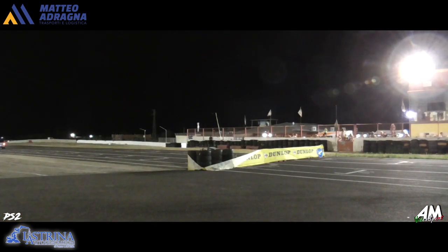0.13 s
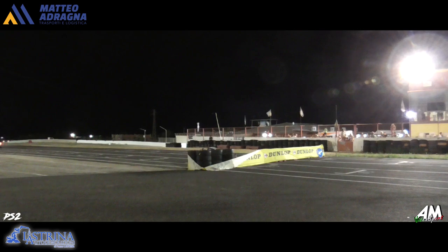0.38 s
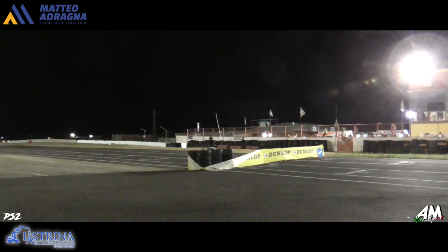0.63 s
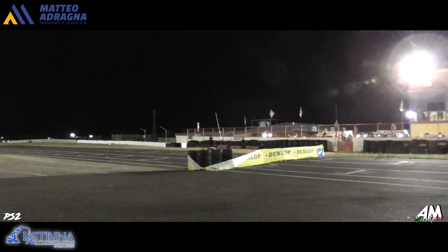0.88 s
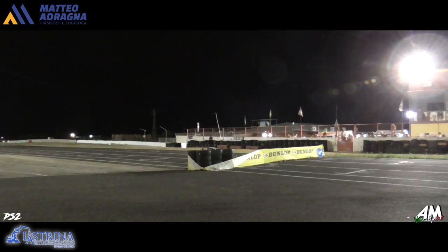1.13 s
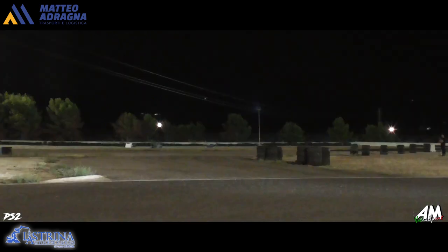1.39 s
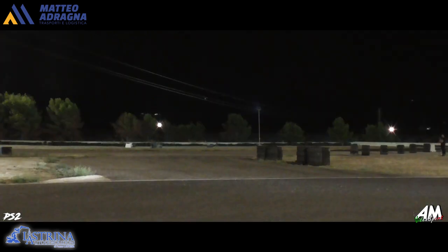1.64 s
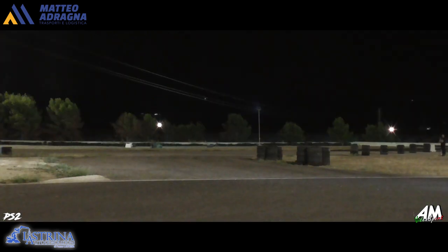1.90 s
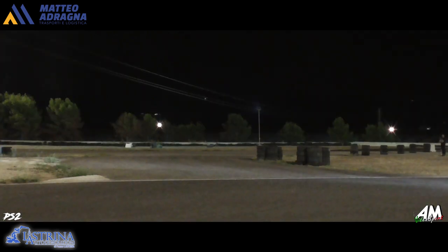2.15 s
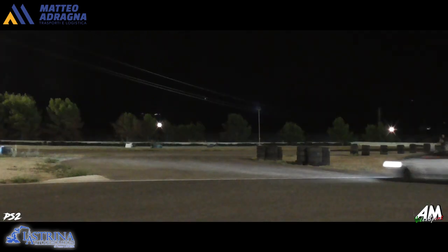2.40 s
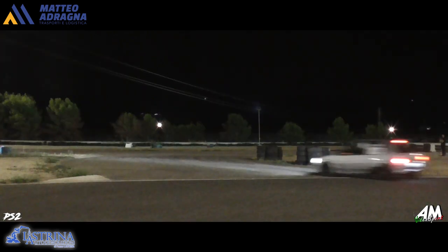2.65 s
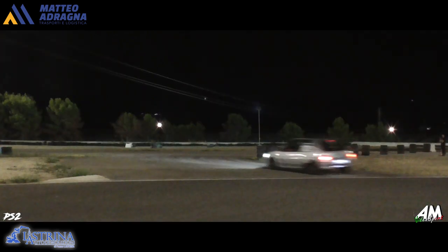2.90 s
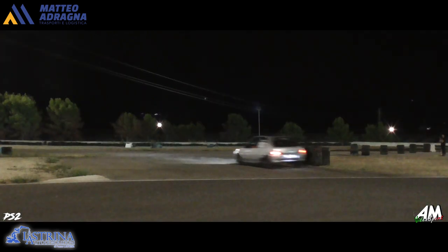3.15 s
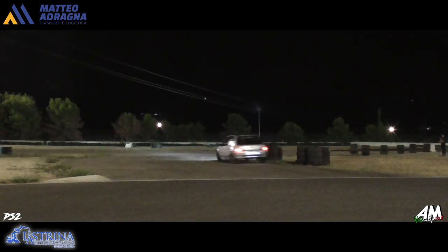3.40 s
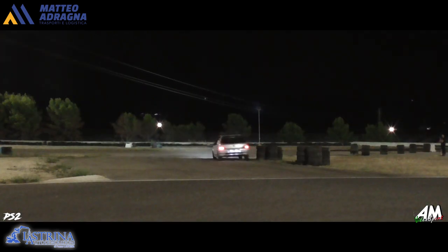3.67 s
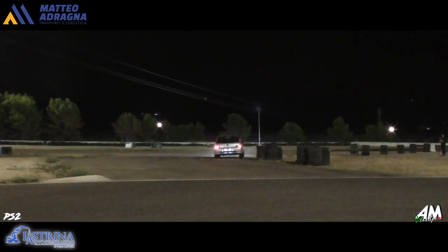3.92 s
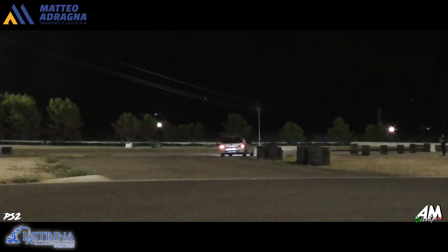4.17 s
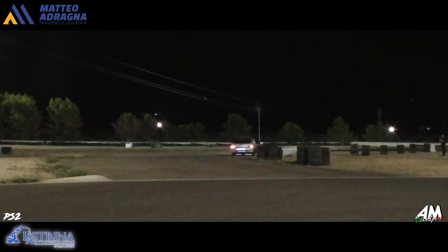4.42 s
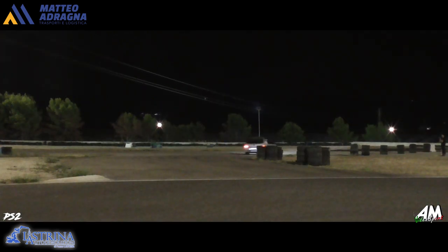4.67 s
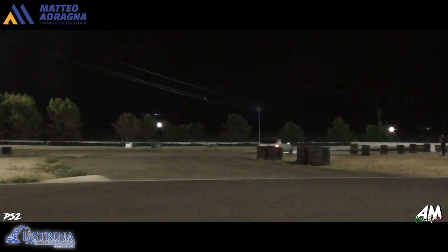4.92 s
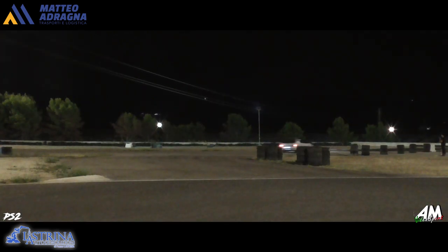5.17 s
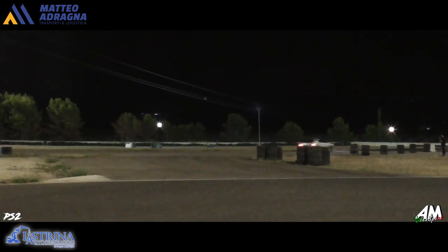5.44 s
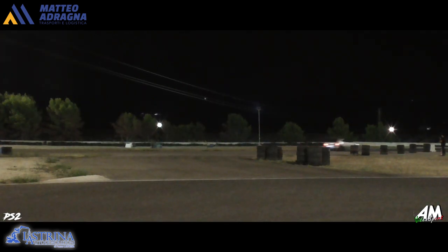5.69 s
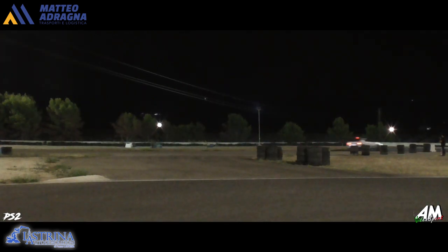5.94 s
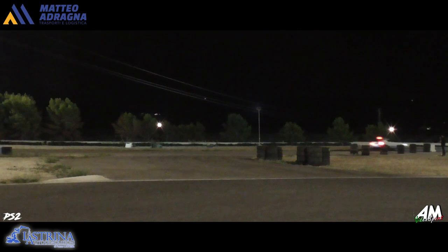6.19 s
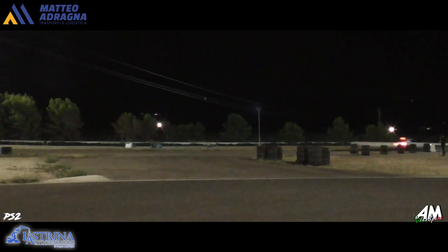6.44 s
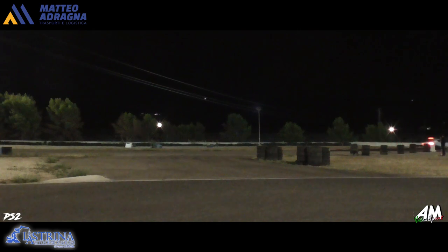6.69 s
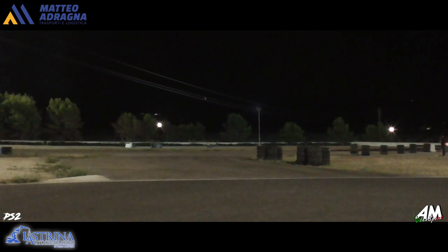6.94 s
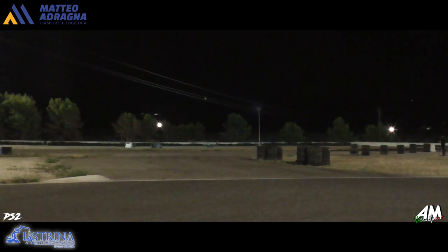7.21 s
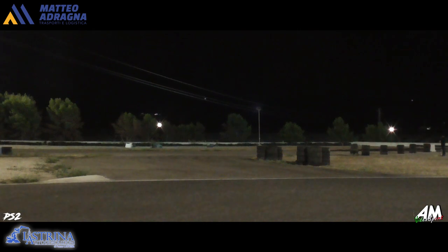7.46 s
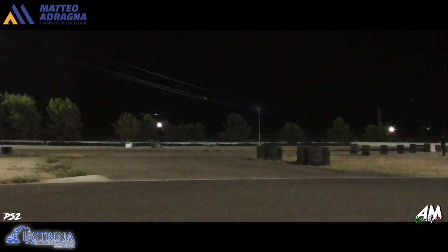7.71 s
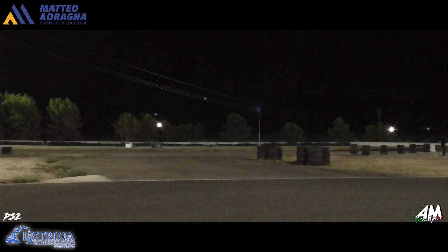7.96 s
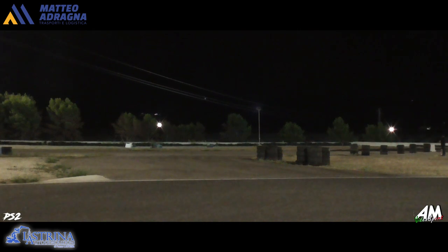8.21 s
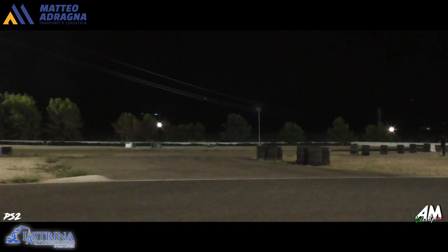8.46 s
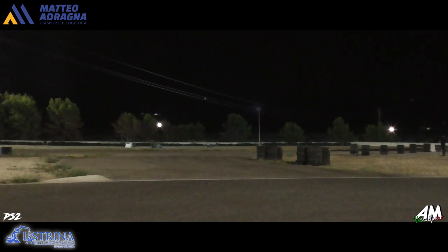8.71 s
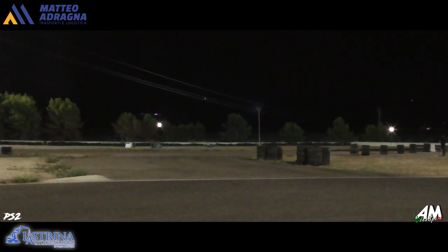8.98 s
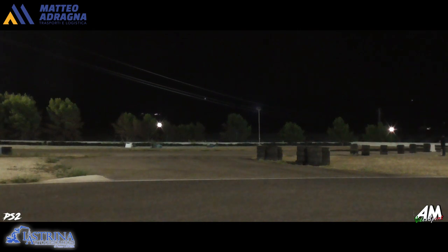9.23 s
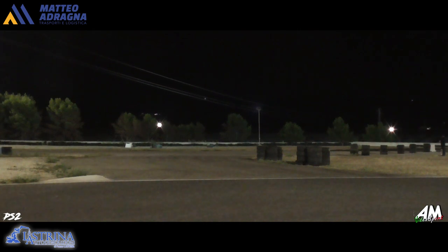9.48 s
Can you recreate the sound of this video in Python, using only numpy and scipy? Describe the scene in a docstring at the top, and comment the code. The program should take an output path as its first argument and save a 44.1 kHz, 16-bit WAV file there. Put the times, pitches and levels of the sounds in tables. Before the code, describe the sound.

Trackside at night, in stereo, with dull wall echoes and faint low wind. From 0 to 1.36 s a small four-cylinder engine climbs steadily, a smooth second engine droning close above it. A hard cut with a soft thump jumps to another bend: the near engine is raspier and hissier and its pitch sags, while a higher distant drone fades by 2.2 s. Grit pings around 2.8 to 3.1 s as the car goes by. At about 3.2 s a heavy booming backfire bursts out, followed by a brief thin, sputtering gap. From 3.8 s the engine pulls away, rising with pulsing rasp and a spitting, hissy edge near 4.4 to 4.8 s. At 6 s it lifts and sinks, quiet and low by 7.3 s. Sharp cracks pop around 7.5 s, then it surges again, climbing to the end with a distant engine rising alongside.

```python
"""The verge of a track at night: small four-cylinder cars; at CHANGE_S the listening spot jumps to another bend.
The near car is a stack of firing orders that rises under load and sags on lift-off, with gated noise for
its rasp, tyres and air. It backfires in damped booms and cracks, and its grit pings as short decaying sines.
A second engine further off drones higher on two smooth orders; dull echoes and lumpy low wind lie behind."""
import sys
import numpy as np
from scipy import signal
from scipy.fft import rfft, irfft, next_fast_len
from scipy.io import wavfile
from scipy.ndimage import uniform_filter1d

SR = 44100
rng = np.random.default_rng(int(sys.argv[2]) if len(sys.argv) > 2 else 0)


def dump_mix(stems):
    """Bounce the given channels to the path in sys.argv[1] as a 16-bit WAV at rate SR."""
    frames = np.atleast_2d(stems).T  # one column per channel
    limited = np.clip(frames, -1, 1)  # hard clip at full scale
    pcm = np.round(limited * 32767).astype(np.int16)
    wavfile.write(sys.argv[1], SR, pcm)


def gain_from_db(level_db):
    """Convert decibel levels to linear amplitude factors (20 dB per decade)."""
    decades = np.asarray(level_db, float) / 20
    return 10 ** decades


N = 423360
CHANGE_S = 1.359
HZ = np.maximum(np.fft.rfftfreq(N, 1 / SR), 1)


def rms_one(x):
    """Scale to unit rms."""
    return x / np.sqrt(np.mean(x ** 2) + 1e-20)


def in_time(rows):
    """Columns of a curve table, one value per sample."""
    s, *columns = np.transpose(rows)
    return [np.interp(np.arange(N) / SR, s, c) for c in columns]


def at_pitch(points, hz):
    """Read a spectrum table at any frequencies, on a log frequency axis."""
    table_hz, values = np.transpose(points)
    return np.interp(np.log(hz), np.log(table_hz), values)


def colour(x, spectrum):
    """Shape by a spectrum, then scale to unit rms."""
    return rms_one(irfft(rfft(x) * gain_from_db(at_pitch(spectrum, HZ)), N))


def span(start, end, edge):
    """One between two times, with ramps outside them."""
    t = np.arange(N) / SR
    return np.clip(1 + np.minimum(t - start, end - t) / edge, 0, 1)


def drift(rate):
    """Slow random wander of unit rms; a higher rate in Hz wanders faster."""
    knots_per_s = 40
    knots = rng.standard_normal(int(N / SR * knots_per_s) + 2)
    memory = np.exp(-2 * np.pi * rate / knots_per_s)
    slow = rms_one(signal.lfilter([1], [1, -memory], knots))
    return np.interp(np.arange(N) * knots_per_s / SR, np.arange(len(slow)), slow)


# Stereo width of the noises. Each row: Hz, side against mid in dB before a small overall cut.
SPREAD = [(60, -29.5), (110, -25), (200, -12), (380, -8.5), (700, -7.5), (1290, -8), (2380, -4.5),
          (4400, -5), (8120, -4.5), (15000, -4.5)]


def wide_noise():
    """Two channels of white noise, alike in the bass and less so in the treble."""
    mid, side = rfft(rng.standard_normal((2, N)))
    return irfft(mid + gain_from_db(at_pitch(SPREAD, HZ) - 0.7) * side * [[1], [-1]], N)


# Firing rate, climbing under load and sagging on lift-off. Each row: time in seconds, Hz.
FIRING = [(0, 154.8), (.244, 161.1), (.94, 175.2), (1.358, 183.2), (1.36, 159.2), (1.5, 159), (1.62, 146.7),
          (1.8, 140.7), (2.29, 113.3), (2.79, 103.5), (3.13, 99.16), (3.32, 99.57), (3.4, 98.36),
          (3.82, 95.14), (4.28, 100.3), (5.31, 118.9), (5.93, 127.9), (6, 122.9), (6.18, 120.9),
          (6.66, 107.6), (7.01, 102.6), (7.31, 88.6), (7.49, 90), (7.56, 98.5), (7.72, 97.84), (7.97, 99.5),
          (8.32, 109.1), (8.73, 113.7), (9.12, 123.9), (9.6, 128.8)]
# Engine balance. Each row: time in seconds, exhaust note in dB before the pipe, fall of its orders
# in dB per octave up to the fourth, rasp in dB, tyre and air hiss in dB.
ENGINE = [(0, -19.5, -7.5, -33.5, -49), (.25, -21, -6.5, -32.5, -52), (.65, -16, -9.5, -32, -47),
          (.95, -15.5, -11.5, -27.5, -48.5), (1.358, -8, -14.5, -29, -47.5),
          (1.36, -12.5, -15.5, -22, -41.5), (1.8, -6, -21.5, -20, -38), (2.17, -9, -13.5, -22.5, -43),
          (2.3, -10.5, -18, -26.5, -44), (2.7, -11.5, -13, -21.5, -42), (2.88, -7.5, -14, -25.5, -42.5),
          (3.13, -8, -15.5, -31, -48), (3.23, -24.5, -1, -24, -42.5), (3.33, -20.5, -4.5, -21, -43.5),
          (3.38, -28, -1.5, -37.5, -57), (3.57, -17, -7.5, -33.5, -48), (3.82, -14, -4.5, -25.5, -44),
          (3.96, -13, -6, -21, -44), (4.28, -14, -7, -27.5, -52), (4.44, -16, -7, -24, -34.5),
          (4.62, -13.5, -9, -22.5, -41), (4.83, -11, -10, -28.5, -43.5), (5.31, -8.5, -14.5, -27.5, -42.5),
          (5.52, -12.5, -9.5, -32.5, -36.5), (5.9, -10.5, -8.5, -31.5, -43),
          (6, -21.5, -12.5, -37.5, -50.5), (6.18, -11, -16, -34.5, -48.5), (6.6, -19, -16, -36, -44),
          (7.01, -15, -19, -40.5, -52.5), (7.2, -22.5, -17, -37.5, -46), (7.3, -25.5, -19, -40, -55),
          (7.48, -26, -17, -39, -67), (7.56, -21.5, -11, -33, -46), (7.72, -9, -13, -34.5, -48.5),
          (7.85, -8.5, -14.5, -34, -46), (7.95, -11.5, -12.5, -30.5, -41), (8.06, -7, -16, -31, -44),
          (8.32, -11.5, -16, -31, -43.5), (8.73, -17, -10.5, -34.5, -50), (9.12, -18, -13, -35, -52.5),
          (9.37, -17.5, -12, -33.5, -53.5), (9.45, -11.5, -13, -32, -46.5), (9.6, -12, -11.5, -32.5, -47.5)]


def near_car():
    """Each firing sounds the exhaust orders and lets out a puff of gas that gates the noise."""
    (hz,), (note_db, fall_db, rasp_db, hiss_db) = in_time(FIRING), in_time(ENGINE)
    turns = np.cumsum(hz) / SR   # in firings
    count = turns.astype(int)
    burns = rng.standard_normal((2, count[-1] + 2))   # no two firings burn alike, nor quite on time
    strength, late = [np.interp(turns - .5, np.arange(len(b)), b) for b in burns]
    within = turns - count
    puff = rms_one(gain_from_db(1.8 * burns[0][count]) * within * np.exp(-7.5 * within))   # dies within the cycle
    gas, road = wide_noise(), wide_noise()
    tone = exhaust_note(hz, turns, strength, late, note_db, fall_db)
    noise = gated_noise(puff, gas, road, rasp_db, hiss_db)
    return tone + rumble(turns, road, rasp_db) + noise + spit(puff, gas)


# The pipe's pull on each order as it slides through. Each row: Hz, gain in dB.
PIPE = [(85, 0), (100, -11), (125, -3.5), (160, -4.5), (190, 0), (225, 13.5), (260, 8.5), (300, 4),
        (350, 7.5), (400, 1.8), (470, 6), (560, 4.5), (650, 1.5), (750, -14), (900, -1), (1300, -20)]
# Throttle shut, second order shifted, mostly down. Each row: start in seconds, end in seconds, change in dB.
OVERRUN = [(1.52, 2.446, -14), (3.36, 3.454, -3), (5.966, 6.871, -13.5), (7.105, 7.45, 1),
           (7.56, 7.62, -11.5), (9.277, 9.381, -3)]
THROTTLE_S = 0.085   # ramp either side
UPPER_FALL_DB = -9.5   # per octave above the fourth order, whatever the load
SECOND_ORDER_LAG = 1.15   # radians the second order lags the others


def exhaust_note(hz, turns, strength, late, note_db, fall_db):
    """Nine orders of the firing rate through the pipe; uneven burns shake the upper ones."""
    tone = np.zeros(N)
    for k in range(1, 10):
        db = note_db + fall_db * np.log2(min(k, 4)) + UPPER_FALL_DB * np.log2(max(k / 4, 1))
        db = db + at_pitch(PIPE, k * hz)
        if k == 2:
            db = db + sum(change * span(start, end, THROTTLE_S) for start, end, change in OVERRUN)
        db = db + .3 * k * drift(6) + .35 * (k - 1) * strength   # higher orders waver more
        phase = 2 * np.pi * k * (turns - .17) - 0.024 * k * k * late - SECOND_ORDER_LAG * (k == 2)
        tone += gain_from_db(db) * np.cos(phase)
    return np.sqrt(2) * tone


# Rumble noise colour. Each row: Hz, relative level in dB per Hz.
RUMBLE = [(40, -47), (65, -14.5), (90, 15), (130, 14), (250, 16), (450, 5.5), (700, -32)]
# Lumps between the firing orders, as the cylinders differ. Each row: order, relative level in dB.
UNEVEN_ORDERS = [(.5, -4.5), (.75, -4), (1.25, -13), (1.5, 2.5), (1.75, -0.5), (2.25, -12.5), (2.5, -14),
                 (3.5, -14.5)]
# Rumble ride. Each row: time in seconds, trim in dB.
RUMBLE_TRIM = [(0, 0.5), (.9, 9), (1.355, 8), (1.4, -2), (2.1, -3.5), (2.4, 4.8), (3.2, 2), (4.3, 3.5),
               (4.7, 0), (6, 2.5), (6.5, -5), (7.7, 4), (9.6, 0)]
RUMBLE_DB, RUMBLE_FOLLOWS = -28, 0.21   # at mean rasp before the trim; share of the rasp's dB swing


def rumble(turns, road, rasp_db):
    """Low noise with fractional orders from cylinders that do not fire alike."""
    level_db = RUMBLE_DB + RUMBLE_FOLLOWS * (rasp_db - rasp_db.mean()) + in_time(RUMBLE_TRIM)[0]
    uneven = sum(gain_from_db(db + 1.3 * drift(1.7)) * np.cos(2 * np.pi * k * turns + k) for k, db in UNEVEN_ORDERS)
    return gain_from_db(level_db) * (colour(road, RUMBLE) + gain_from_db(-15.0) * uneven)


# How sharply each firing stands out of the noise. Each row: time in seconds, bite from 0 to 1.
BITE = [(0, .28), (3.15, .28), (3.2, .92), (3.35, .9), (3.42, .62), (4.3, .6), (4.5, .85), (4.8, .55),
        (5.9, .55), (6, .25), (7.4, .25), (7.6, .38), (9.6, .38)]
# Exhaust rasp colour. Each row: Hz, relative level in dB per Hz.
RASP = [(240, -18.5), (400, -5.5), (423, -15), (486, -2), (541, -7), (586, -6), (1230, -10), (1770, -24),
        (2800, -38.5), (3640, -53.5), (6160, -120)]
# Tyre and air hiss colour. Each row: Hz, relative level in dB per Hz.
HISS = [(1200, -36), (2000, 4), (2800, -3.5), (3300, -1), (4500, -2.5), (6000, -0.5), (8000, -12.5)]
# Airy top colour. Each row: Hz, relative level in dB per Hz, before the extra top.
AIR = [(4500, -29), (7000, -7), (9000, 3.5), (11500, 1.5), (13500, -11.5), (16000, -34)]
# Airy top ride. Each row: time in seconds, level against the hiss in dB, extra above 11 kHz in dB.
AIRY = [(0, -7, -20), (1.355, -17, -14), (1.365, -21.5, 17), (2.2, -1.5, 6.5), (2.8, 1.5, 9),
        (3.4, 2, 10.5), (4.4, 4, 6), (5.5, -0.5, 8.5), (5.95, 1, 7.5), (6.4, -8, -8), (7.4, -7, -9),
        (7.6, 1, -20), (8, -21, -22), (9.3, -24.5, -3), (9.6, -21, -5)]


def gated_noise(puff, gas, road, rasp_db, hiss_db):
    """Rasp, hiss and airy top: turbulent noise pulsed by the gas puffs, more deeply as the bite grows."""
    bite, = in_time(BITE)
    gate = np.sqrt(1 - bite ** 2) * (1 - bite) + bite * puff
    gate = gate / np.sqrt(uniform_filter1d(gate ** 2, size=4000))   # pulses without changing the level
    rasp = colour(gate * gas, RASP)
    hiss = colour((1 - bite + gate) * gain_from_db(2.36 * drift(6.3)) * road, HISS)
    air = colour((1.7 * (1 - bite) + gate) * gain_from_db(2.9 * drift(10)) * gas, AIR)
    airy_db, bright_db = in_time(AIRY)
    top = signal.sosfilt(signal.butter(4, 11000, "high", fs=SR, output="sos"), air)
    air = air + gain_from_db(bright_db) * top
    return gain_from_db(rasp_db) * rasp + gain_from_db(hiss_db) * hiss + gain_from_db(hiss_db + airy_db) * air


# The tailpipe swings past and its bright spit is heard. Each row: start in seconds, length in seconds,
# centre at the start in Hz, centre at the end in Hz, level of a band on the centre in dB.
SPIT = [(2.838, 0.026, 4452, 4405, -36.5), (4.432, 0.14, 7600, 2100, -38.5),
        (4.492, 0.12, 1475, 1489, -34.5), (4.728, 0.047, 2600, 3410, -41), (5.143, 0.046, 4255, 4300, -37),
        (5.28, 0.069, 4340, 4300, -45.5), (5.433, 0.45, 4400, 4334, -49), (7.59, 0.089, 3501, 3500, -47.5)]
SPIT_EDGE_DB_PER_S = 354   # fade outside each row's time


def spit(puff, noise):
    """The sharp front of each firing through a band whose centre slides."""
    out = np.zeros((2, N))
    for start, length, hz0, hz1, db in SPIT:
        part = slice(int((start - .1) * SR), int((start + length + .1) * SR))
        t = np.arange(part.start, part.stop) / SR - start
        centre_hz = hz0 * (hz1 / hz0) ** np.clip(t / length, 0, 1)
        level_db = db + SPIT_EDGE_DB_PER_S * np.minimum(np.minimum(t, length - t), 0)
        fronts = puff[part] ** 1.14 * noise[:, part]
        for hz in 1500 * 2 ** (np.arange(9) / 3):   # third-octave bands
            edges = [hz / 2 ** (1 / 6), hz * 2 ** (1 / 6)]
            band = signal.sosfilt(signal.butter(2, edges, "band", fs=SR, output="sos"), fronts)
            out[:, part] += rms_one(band) * gain_from_db(level_db - 17 * np.log2(hz / centre_hz) ** 2)
    return out


# Bangs in the exhaust. Each row: time in seconds, 3.5 ms before the bang starts, boom in dB,
# knock and crack trims against the boom in dB.
BACKFIRES = [(3.157, -10, 2, -39), (3.201, 3.5, -30, -29), (3.213, -15, -11, -22), (3.225, -4.5, -18, -34),
             (7.075, -22.5, 12, -25), (7.495, -13.5, -8, -16), (7.527, -8.5, -45, -9.5),
             (7.547, -14, -4, -21), (7.561, -19, -11, -25)]


def backfires():
    """Unburnt fuel bangs in the pipe: a boom that drops in pitch, a sharper knock and a noisy crack."""
    out, t = np.zeros(N + SR), np.arange(SR // 20) / SR
    turns = 190 * t + 0.46 * (1 - np.exp(-t / 0.00092))   # the steep front runs ahead of the slow tail
    boom = -np.sin(2 * np.pi * turns) * t / 0.00089 * np.exp(1 - t / 0.0013)
    knock = -np.sin(2 * np.pi * 1000 * t) * t / 0.0006 * np.exp(1 - t / 0.00074)
    for s, boom_db, knock_db, crack_db in BACKFIRES:
        i = int((s + .0035) * SR)   # the bang starts a little after the row's time
        crack = gain_from_db(crack_db + 6) * np.exp(-t / 0.0026) * rng.standard_normal(len(t))
        out[i:i + len(t)] += gain_from_db(boom_db) * (boom + gain_from_db(knock_db - 6.0) * knock + crack)
    return out[:N]


def burst(out_hz, cycles):
    """A damped sine of height about 1."""
    t = np.arange(int(cycles * 6 * SR / out_hz)) / SR
    return np.sin(2 * np.pi * out_hz * t) * np.exp(-t * out_hz / cycles)


# Grit pinging off the bodywork. Each row: time in seconds, level in dB before roughening, ping in Hz.
GRIT = [(2.8419, -13, 8700), (2.8502, -26, 4530), (2.87, -13.5, 4340), (3.0111, -18, 8800),
        (3.0783, -30, 8500), (3.149, -17, 8500), (4.1535, -24, 8290), (6.572, -33, 4511),
        (6.867, -28, 9530)]
TICKS_PER_S, TICK_DB = 1.2, -43   # faint random ticks: mean rate; level of the softest


def grit():
    """Short noisy pings at the table's times, with a few faint random ticks."""
    out = np.zeros(N + SR)
    pings = list(GRIT)
    for s, db, pitch, keep in rng.random((40, 4)):
        if keep * 40 < TICKS_PER_S * N / SR:
            pings.append((s * N / SR, TICK_DB + 6 * db, 3400 * 2 ** (1.2 * pitch)))
    for s, level_db, ping_hz in pings:
        i, ping = int(s * SR), burst(ping_hz, cycles=5.2)
        ping = ping * (1 + .5 * rng.standard_normal(len(ping)))   # roughened by noise
        out[i:i + len(ping)] += gain_from_db(level_db) * ping
    return out[:N]


# Second engine, each time it stands out. Each row: start in seconds, end in seconds, start in Hz,
# end in Hz, start in dB, end in dB.
FAR = [(0, 1.32, 180.1, 191.3, -22.5, -16.5), (1.385, 2.19, 241.9, 238.4, -15.5, -20),
       (6.151, 6.95, 165.6, 181.8, -38, -25), (8.032, 9.598, 173.9, 221, -22, -31.5)]
FAR_OCTAVE_DB = -19.5   # its second order against the table level


def far_engine():
    """Two smooth orders on a steady glide that fade in and out, cut hard at the jump."""
    out, t = np.zeros(N), np.arange(N) / SR
    for start, end, hz0, hz1, db0, db1 in FAR:
        hz, db = in_time([(start, hz0, db0), (end, hz1, db1)])
        same_spot = (t < CHANGE_S) == (start < CHANGE_S)
        cycle = 2 * np.pi * np.cumsum(hz) / SR
        first = gain_from_db(0.8 * drift(7.6)) * np.sin(cycle)
        second = gain_from_db(FAR_OCTAVE_DB + 5.0 * drift(6.1)) * np.sin(2 * cycle)
        out += span(start, end, 0.073) * same_spot * gain_from_db(db) * (first + second)
    return np.sqrt(2) * out


# Barriers, left and right in turn. Each row: delay in seconds, level in dB.
ECHOES = [(.021, -22.5), (.034, -16), (.058, -21.5), (.083, -24), (.13, -38), (.19, -47.5)]


def barriers(x):
    """A few dull echoes from the track walls."""
    out = np.zeros((2, N))
    dull = signal.sosfilt(signal.butter(1, [300, 5000], "band", fs=SR, output="sos"), x)
    for k, (s, db) in enumerate(ECHOES):
        lag = int(s * SR)
        out[k % 2, lag:] += gain_from_db(db) * dull[:N - lag]
    return out


# Wind lumps on the microphone. Each row: peak time in seconds, level added to the calm in dB.
GUSTS = [(1.0, -40), (6.47, -41), (9.6, -36)]
GUST_FALL_DB_PER_S, CALM_DB = 18, -48


def wind():
    """Low lumpy noise on the ports, swelling and fading around each gust."""
    low = signal.sosfilt(signal.butter(2, [42, 75], "band", fs=SR, output="sos"), wide_noise())
    t = np.arange(N) / SR
    gusts = sum(gain_from_db(db - GUST_FALL_DB_PER_S * np.abs(t - s)) for s, db in GUSTS)
    return (gain_from_db(CALM_DB) + gusts) * rms_one(low)


JUMP_DB = -13   # fast part of the step; the slow part is 6 dB lower


def jump():
    """The two spots do not meet at the same pressure: a sudden step that relaxes, fast and then slowly."""
    t = np.arange(N) / SR - CHANGE_S
    relax = np.exp(-np.abs(t) / .0015) + gain_from_db(-6) * np.exp(-np.abs(t) / .008)
    return -gain_from_db(JUMP_DB) * (t >= 0) * relax


def scene():
    """Cars, bangs and pings with their echoes, over the wind, and the step at the jump."""
    direct = near_car() + far_engine() + backfires() + grit()
    return direct + barriers(direct.mean(axis=0)) + wind() + jump()


def band_limit(x):
    """A steep low-pass at the top of the band."""
    return signal.sosfilt(signal.butter(12, 16470, fs=SR, output="sos"), x)


# Housing response. Each row: Hz, gain in dB.
MICROPHONE = [(20, -15), (45, -7.5), (70, -0.5), (2200, -0.5), (2900, -2), (4300, 1), (5300, -5.5),
              (6100, -10), (6750, -11.5), (7400, -5.5), (8300, 0), (11500, -5.5), (13500, -13.5),
              (15500, -10.5)]
# Balance of the ports. Each row: Hz, left minus right in dB.
TILT = [(60, 0.5), (110, 0), (200, -0.5), (380, -0.5), (700, 0.5), (1290, 2.5), (2380, 1), (4400, 0),
        (8120, 0), (15000, -3.5)]
# Phase between the ports. Each row: Hz, radians the left port leads.
LEAD = [(300, 0.03), (1200, -0.041), (2500, -0.38), (4500, -0.066), (8000, -1.37), (14000, -1.4)]


def record(dry):
    """Peaks are rounded; the housing colours the sound and shifts the two ports against each other."""
    half, margin = np.array([[.5], [-.5]]), 2048   # half of each difference per port; samples
    window = np.hanning(2 * margin)
    fade = np.r_[window[:margin], np.ones(N), window[margin:]]
    rounded = 1.545 * np.tanh(dry / 1.623)
    wide = fade * np.pad(rounded, [(0, 0), (margin, margin)], "reflect")   # keeps the ends clean
    size = next_fast_len(len(fade))
    hz = np.maximum(np.fft.rfftfreq(size, 1 / SR), 1)
    gain = gain_from_db(at_pitch(MICROPHONE, hz) + half * at_pitch(TILT, hz))
    ports = gain * np.exp(1j * half * at_pitch(LEAD, hz))
    heard = irfft(rfft(wide, size) * ports, size)
    heard = signal.sosfilt(signal.cheby2(10, 50, 16300, fs=SR, output="sos"), heard)
    heard = heard[:, margin:margin + N]
    return band_limit(np.clip(heard, -.995, .995))


dry = scene()
out = record(dry)
dump_mix(out)
```